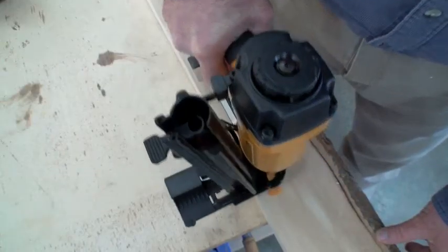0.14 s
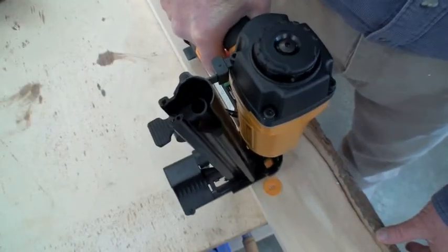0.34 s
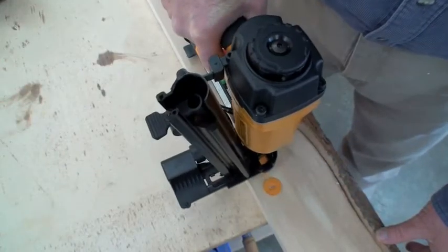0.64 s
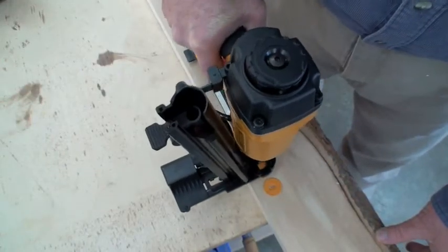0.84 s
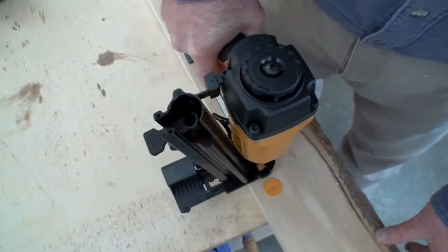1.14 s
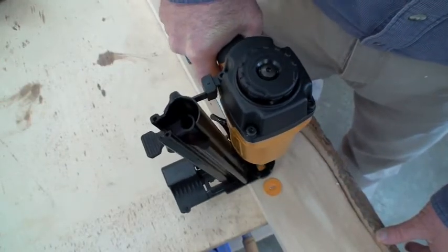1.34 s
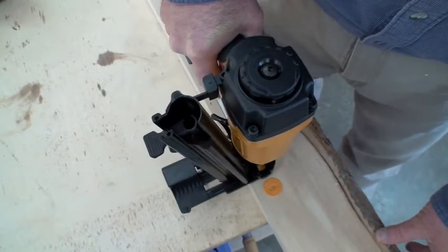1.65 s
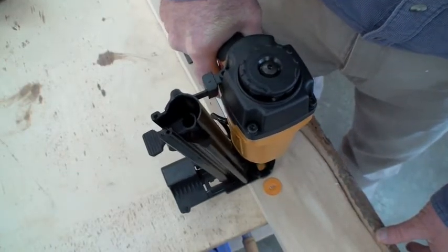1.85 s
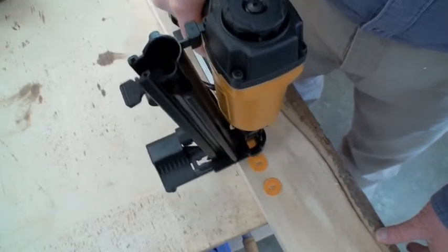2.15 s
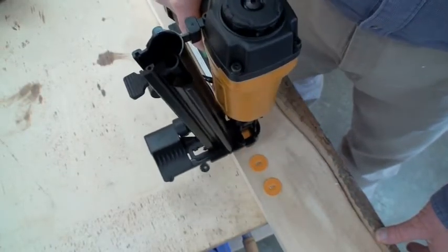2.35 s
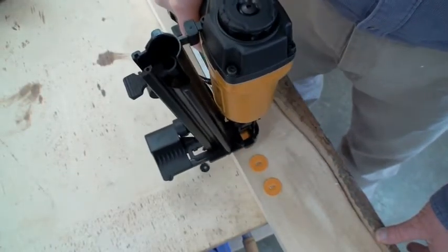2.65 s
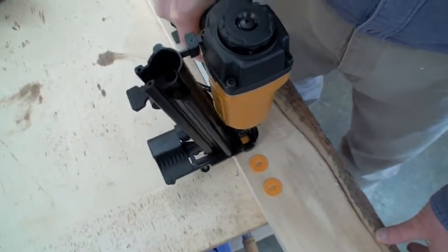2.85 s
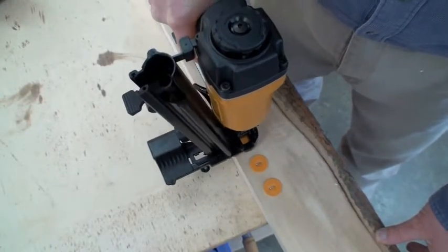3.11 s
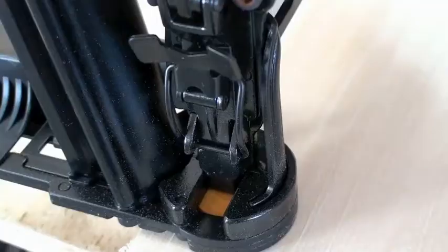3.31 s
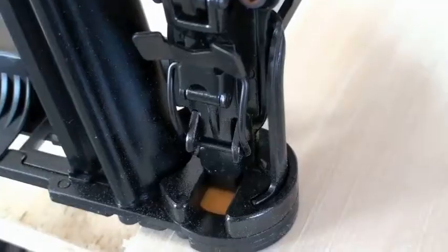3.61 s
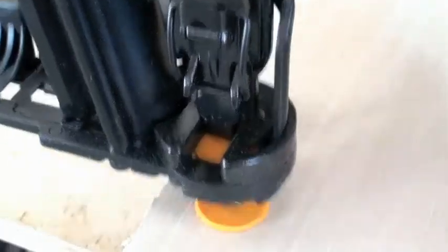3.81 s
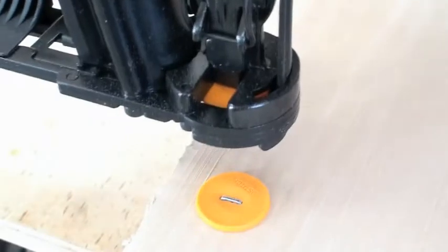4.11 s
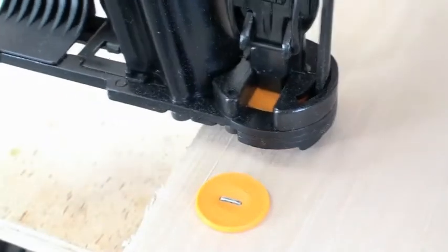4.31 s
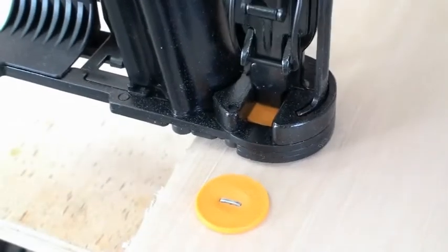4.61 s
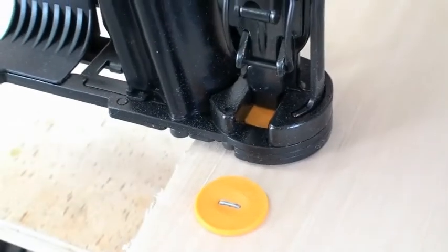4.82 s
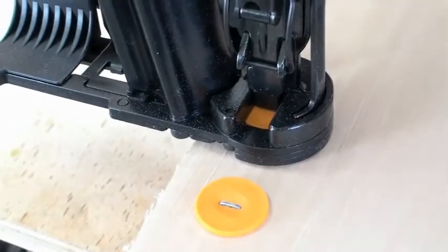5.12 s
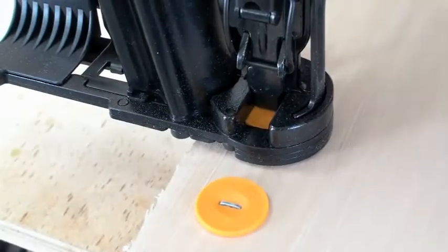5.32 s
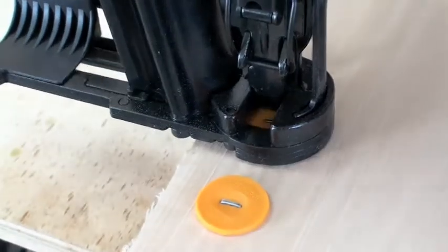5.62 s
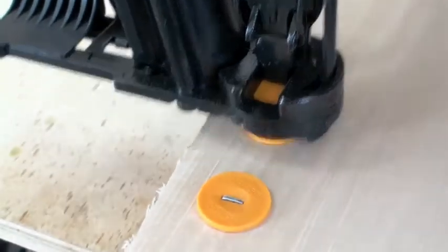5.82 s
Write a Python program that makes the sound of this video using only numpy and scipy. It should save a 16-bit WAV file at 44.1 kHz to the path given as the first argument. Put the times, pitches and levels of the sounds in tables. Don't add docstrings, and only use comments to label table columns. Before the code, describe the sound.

Loud air-tool shots punch caps into a board, spitting short exhaust hisses, while soft wooden thuds and metal ticks fill the gaps over low rumble.

```python
import sys
import numpy as np
from scipy import signal
from scipy.fft import rfft, irfft
from scipy.io import wavfile
from scipy.ndimage import uniform_filter1d

SR = 44100
rng = np.random.default_rng(int(sys.argv[2]) if len(sys.argv) > 2 else 0)


def materialize(psi):
    bounded = np.clip(np.atleast_2d(psi).T, -1, 1)
    quanta = np.round(bounded * 32767).astype(np.int16)
    wavfile.write(sys.argv[1], SR, quanta)


def boost(x):
    u = np.asarray(x, float) / 20
    return 10 ** u


N = 262836
LEAD = SR // 4
SCENE_CHANGE_S = 3.39

# start in seconds, level in dB.
VALVE_POPS = [
    (-.21, 15.5),
    (1.6119, -10),
    (3.4876, -6),
    (5.576, -7.5),
]
# start in seconds, level in dB.
DRIVER_BLOWS = [
    (-.19, 4.1),
    (1.6365, 12),
    (3.5145, 24.5),
    (5.6000, 10.2),
]
# start in seconds, level in dB.
EXHAUST_BLASTS = [
    (-.04, 2.4),
    (1.761, 6.1),
    (3.6772, 10),
    (5.7407, 1.6),
]
# start in seconds, level in dB.
PISTON_RETURNS = [
    (-.012, 10.6),
    (1.7910, 10.7),
    (3.7068, 3.3),
    (5.7690, 2.5),
]

# start in seconds, level in dB.
TOUCHES = [
    (.977, -15),
    (2.922, -19),
    (4.497, -31.5),
    (4.673, -31.5),
    (4.74, -34),
    (4.889, -33),
    (4.915, -36),
]
# start in seconds, level in dB.
BOUNCES = [
    (.988, -16.5),
    (1.599, -21.5),
    (2.932, -20),
    (4.504, -32.5),
]
# start in seconds, level in dB.
PRESSES = [
    (1.036, -5.5),
    (1.094, -16.5),
    (2.976, -0.5),
    (3.014, -14),
    (4.515, -29.5),
    (4.678, -29),
]
# start in seconds, level in dB.
SAGS = [(1.044, -16), (1.057, -12), (1.427, -29), (1.49, -38.5), (3.057, -23), (4.743, -30), (4.753, -19.5),
        (4.83, -29), (4.895, -32), (4.907, -28)]
# start in seconds, level in dB.
TRIGGER_CLICKS = [(1.585, -32.5), (1.747, -11), (3.463, -29), (3.469, -22), (3.656, -20), (5.559, -31.5),
                  (5.566, -28)]
# start in seconds, level in dB.
FEED_RATTLES = [(.176, -15.5), (1.035, -17), (1.057, -31.5), (1.43, -40), (2.071, -20), (3.656, 5),
                (4.504, -32), (4.74, -30)]

# frequency in Hz, density in dB per Hz.
VALVE_SPECTRUM = [(100, 1), (400, 7.5), (800, -6), (1400, 2), (2200, -5.5), (5000, -2), (12000, 0.5),
                  (13500, -8)]
# frequency in Hz, density in dB per Hz.
DRIVER_SPECTRUM = [(50, -5), (120, -17.5), (250, 2), (410, 2.5), (800, -0.5), (1300, 2), (2100, 0),
                   (2700, -5), (5000, -11.5), (11000, -9), (13500, -11)]
# frequency in Hz, density in dB per Hz.
EXHAUST_SPECTRUM = [(100, -26), (500, 4.5), (1500, 0.5), (3000, 6), (4200, 10), (7000, 7), (10500, 11),
                    (12500, 12), (13500, -21.5)]
# frequency in Hz, density in dB per Hz.
PISTON_SPECTRUM = [(60, -19), (200, 0.5), (500, 0), (900, 2.5), (1400, 8.5), (2100, 3), (2700, -5),
                   (5000, -5), (13500, -18.5)]
# frequency in Hz, density in dB per Hz.
THUD_SPECTRUM = [(100, -16.5), (250, 3.5), (500, 8.5), (900, 0.5), (1400, -5), (2200, -10), (3200, -24.5),
                 (8000, -55)]
# frequency in Hz, density in dB per Hz.
TICK_SPECTRUM = [(800, -20), (2000, 10.5), (5000, 3.5), (9000, 8.5), (13000, 5.5)]
# frequency in Hz, density in dB per Hz.
SCUFF_SPECTRUM = [(1500, -20), (2500, 6.5), (4500, 2), (7000, -10), (13000, -14)]
# frequency in Hz, density in dB per Hz.
RUMBLE_SPECTRUM = [(15, -27.5), (25, -14), (140, -0.5), (178, -3), (366, -5), (430, -11), (738, -12),
                   (977, -18.5), (1850, -47), (3000, -35), (3900, -43), (6600, -120)]
# frequency in Hz, density in dB per Hz.
HISS_SPECTRUM = [(590, -50), (1000, -5.5), (1400, -0.5), (2020, -5), (2430, -8), (12300, -13),
                 (13300, -11.5)]

# frequency in Hz, level in dB, T60 in seconds.
BOARD_MODES = [(65.4, -13, 0.061), (120.7, -6, 0.09), (169.5, -8, 0.17), (202.3, -8.5, 0.23),
               (255.3, 3.5, 0.093), (264, -1.5, 0.073), (328.3, -8, 0.25)]
# frequency in Hz, level in dB, T60 in seconds.
PLATE_MODES = [(352, -14, 0.2), (416.3, -1.5, 0.11), (423.6, -1.5, 0.096), (587, -31, 0.032),
               (740, -29, 0.049), (974, -19, 0.052)]
# frequency in Hz, level in dB, T60 in seconds.
BODY_MODES = [(1196, 2.5, 0.013), (1340, -5.5, 0.023), (1504, 1.5, 0.011), (1800, -15, 0.03),
              (2440, -17, 0.026), (3720, -24, 0.027)]

# frequency in Hz, T60 in seconds.
ROOM_T60_S = [(60, .9), (260, 0.61), (700, 0.7), (1840, 0.68), (4850, 0.64), (12800, 0.3)]
# centre in Hz, width in Hz, lift in dB.
ROOM_LIFTS = [(157.6, 42, 8), (826, 98, 6), (1277, 47, 1.5), (1534, 152, -1), (1910, 160, 2.5),
              (2245, 89, 0)]
ROOM_EDGES_HZ = 25 * 2 ** np.arange(0, 9.3, 1 / 3)

# start in seconds, hold in seconds, level in dB.
AIR_GUSTS = [
    (3.80, 0.091, -4),
    (5.89, 0.024, -7),
]
# time in seconds, rate in Hz.
EDDY_RATE_HZ = [
    (3.81, 104.8),
    (3.86, 56.4),
    (3.92, 79.2),
    (3.95, 88.2),
    (3.975, 54.9),
    (5.89, 89.85),
    (5.915, 62),
    (5.96, 55),
]
# time in seconds, gain in dB.
GAIN_DRIFT_DB = [
    (0, 0),
    (1.5, 0.5),
    (2.3, -3.5),
    (4.3, -5.5),
    (5.96, -1),
]


def in_time(rows):
    return np.interp(np.arange(N) / SR, *np.transpose(rows))


def at_hz(points, hz):
    table_hz, values = np.array(points)[:, 0], np.array(points)[:, 1]
    return np.interp(np.log(hz + 1e-9), np.log(table_hz), values)


def coloured(spectrum, size):
    hz = np.fft.rfftfreq(size, 1 / SR)
    noise = irfft(rfft(rng.standard_normal(size)) * boost(at_hz(spectrum, hz)), size)
    return noise / np.std(noise)


def bursts(events, spectrum, rise_s, hold_s, fall_s):
    out, t = np.zeros(N + LEAD + SR), np.arange(SR // 4) / SR
    shape = (1 - np.exp(-t / rise_s)) * np.exp(-np.maximum(t - hold_s, 0) / fall_s)
    target = boost(at_hz(spectrum, np.fft.rfftfreq(len(t), 1 / SR)))
    for start_s, level_db in events:
        i = round(start_s * SR) + LEAD
        raw = rfft(shape * coloured(spectrum, len(t)))
        even = target / np.sqrt(uniform_filter1d(np.abs(raw) ** 2, size=40))
        burst = irfft(raw * even, len(t)) * (t < 0.2)
        burst = burst * np.sqrt(np.sum(shape ** 2) / np.sum(burst ** 2))
        out[i:i + len(t)] += boost(level_db) * burst
    return out[:N + LEAD]


def struck(times_s, levels_db, modes, contact_hz, settle_s):
    at, out = np.round(times_s * SR).astype(int) + LEAD, 0
    spread_db = rng.normal(0, 1.0, (len(at), len(modes)))
    t = np.arange(SR // 20) / SR
    for k, (hz, mode_db, t60_s) in enumerate(modes):
        clicks = np.full(N + LEAD, 1e-18)
        np.add.at(clicks, at, boost(levels_db + mode_db + spread_db[:, k]) * (-1) ** k)
        r, w = boost(-60 / (t60_s * SR)), 2 * np.pi * hz / SR
        push = np.exp(-t / settle_s) * np.cos(w * t * SR)
        driven = signal.oaconvolve(clicks, 2 * push / np.sum(np.abs(push)))[:N + LEAD]
        out = out + signal.lfilter([0, np.sin(w)], [1, -2 * r * np.cos(w), r * r], driven)
    return signal.lfilter(*signal.butter(2, contact_hz, fs=SR), out)


def workshop(x, wet_db, lumpy_db):
    t, tail = np.arange(int(1.3 * SR)) / SR, 0
    chance = np.clip(coloured([(30, 0), (600, 0), (1500, -20)], len(t)), -2, 2)
    lumps = boost(lumpy_db * np.exp(-t / 0.074) * chance)
    white = rng.standard_normal((2, len(t))) * lumps
    for k, (low_hz, high_hz) in enumerate(zip(ROOM_EDGES_HZ, ROOM_EDGES_HZ[1:])):
        band_filter = signal.butter(2, [low_hz, high_hz], "band", fs=SR, output="sos")
        band = signal.sosfilt(band_filter, white[k % 2])
        tail = tail + band * boost(-60 * t / at_hz(ROOM_T60_S, np.sqrt(low_hz * high_hz)))
    hz = np.fft.rfftfreq(len(t), 1 / SR)
    lift_db = sum(db / (1 + (2 * (hz - centre) / width) ** 2) for centre, width, db in ROOM_LIFTS)
    tail = irfft(rfft(tail) * boost(lift_db), len(t))
    tail = tail * (1 - np.exp(-(t / 0.0016) ** 2))
    tail = tail * np.clip((1.1 - t) / 0.2, 0, 1)
    return boost(wet_db) * signal.fftconvolve(x, tail)[:len(x)]


def rumble():
    return boost(-43.5 + 1.16 * in_time(GAIN_DRIFT_DB)) * coloured(RUMBLE_SPECTRUM, N)


def buffeting():
    wander = np.clip(0.4 * coloured([(3, 0), (25, 0), (60, -30)], N), -2, 2)
    phase = 2 * np.pi * np.cumsum(in_time(EDDY_RATE_HZ) * boost(wander)) / SR
    turbulence = coloured([(20, -6), (60, 6.5), (200, -6), (500, -39)], N)
    eddies = np.sin(phase) + 0.36 * np.sin(2 * phase - 1.2) + 0.31 * turbulence
    rise_s, fall_s = 0.014, 0.03
    t, level = np.arange(N) / SR, 0
    for start_s, hold_s, level_db in AIR_GUSTS:
        rise = np.clip((t - start_s) / rise_s, 0, 1)
        fall = np.exp(-np.maximum(t - start_s - rise_s - hold_s, 0) / fall_s)
        level = level + boost(level_db) * rise * fall
    surge_s, surge_width_s, surge_db = 3.888, 0.0092, 2.5
    level = level * boost(surge_db * np.exp(-((t - surge_s) / surge_width_s) ** 2))
    return level * eddies


def squeak():
    start_s, end_s, base_hz, arch_hz = 1.113, 1.176, 5350, 500
    part = np.clip((np.arange(N) / SR - start_s) / (end_s - start_s), 0, 1)
    arch = np.sin(np.pi * part)
    tone = np.sin(2 * np.pi * np.cumsum(base_hz + arch_hz * arch) / SR)
    rough = coloured([(20, 0), (250, -3), (600, -30)], N)
    level = boost(-44) * np.sqrt(arch + 1e-12) * (0.7 + part)
    return level * (0.8 + rough) * tone


def knocks():
    kinds = [
        (TOUCHES, (-19.5, -0.5, -2, -18)),
        (BOUNCES, (-16.5, 1, -6.5, -9)),
        (PRESSES, (-11, 1.5, -12.5, -25.5)),
        (SAGS, (0.5, -15, -20, -26)),
        (TRIGGER_CLICKS, (-27, -5, 1, -14)),
        (FEED_RATTLES, (-12, -38, -32, -2)),
    ]
    contacts = [(s, *np.add(db, mix)) for rows, mix in kinds for s, db in rows]
    s, board_db, plate_db, body_db, tick_db = np.transpose(contacts)
    board = struck(s, board_db, BOARD_MODES, contact_hz=406, settle_s=0.0045)
    plate = struck(s, plate_db, PLATE_MODES, contact_hz=1200, settle_s=0.0044)
    wood = board + plate
    thud_db = np.maximum(board_db, plate_db) - 12.0
    thuds = bursts(zip(s, thud_db), THUD_SPECTRUM, rise_s=0.0026, hold_s=0.00087, fall_s=0.031)
    body = struck(s, body_db, BODY_MODES, contact_hz=5100, settle_s=0.00089)
    ticks = bursts(zip(s, tick_db), TICK_SPECTRUM, rise_s=0.0001, hold_s=0.00057, fall_s=0.0025)
    scuffs = bursts(zip(s, tick_db - 13), SCUFF_SPECTRUM, rise_s=0.002, hold_s=0.0037, fall_s=0.02)
    ticks = ticks + scuffs
    far = boost(-6.5) * wood + boost(-2.0) * thuds + body + boost(0.5) * ticks
    return wood + thuds + body + ticks + workshop(far, wet_db=-33.5, lumpy_db=0.5)


def stapler():
    valve = bursts(VALVE_POPS, VALVE_SPECTRUM, rise_s=0.0016, hold_s=0.006, fall_s=0.0095)
    driver = bursts(DRIVER_BLOWS, DRIVER_SPECTRUM, rise_s=0.00043, hold_s=0.0023, fall_s=0.00088)
    driver = driver + boost(-16.5) * np.roll(driver, round(0.008 * SR))
    exhaust = bursts(EXHAUST_BLASTS, EXHAUST_SPECTRUM, rise_s=0.00074, hold_s=0.0041, fall_s=0.03)
    piston = bursts(PISTON_RETURNS, PISTON_SPECTRUM, rise_s=0.0001, hold_s=0.0045, fall_s=0.0018)
    s, level_db = np.transpose(VALVE_POPS + EXHAUST_BLASTS)
    puff_modes = [(38, 3.5, 0.04), (65.5, 6.0, 0.062)]   # Hz, dB, T60 s
    puffs = struck(s, level_db - 14.5, puff_modes, contact_hz=211, settle_s=0.0062)
    valve_hits = [(s + 0.00199, db + 6) for s, db in VALVE_POPS]
    s, level_db = np.transpose(valve_hits + PISTON_RETURNS)
    clang = struck(s + 0.00134, level_db - 9.5, BODY_MODES, contact_hz=3970, settle_s=0.00034)
    near = valve + boost(-5.5) * driver + exhaust + piston + puffs + clang
    far = boost(-1.0) * valve + boost(4.5) * driver + boost(-9.0) * exhaust + boost(-5.0) * piston
    return near + workshop(far, wet_db=-31, lumpy_db=4.5)


def scene():
    sound = (stapler() + knocks())[LEAD:] + squeak()
    dip_hz, dip_width_hz, dip_share = 1560, 220, 0.6
    band = signal.lfilter(*signal.iirpeak(dip_hz, dip_hz / dip_width_hz, fs=SR), sound)
    sound = sound - dip_share * band * (np.arange(N) > SCENE_CHANGE_S * SR)
    sound = sound + buffeting() + rumble()
    bass = signal.lfilter(*signal.butter(2, 70, fs=SR), sound)
    side = boost(-24.5) * np.roll(bass, SR // 300)
    return np.array([sound + side, sound - side])


def gain_control(dry):
    heard = signal.lfilter(*signal.butter(2, 200, "high", fs=SR), dry[0]) ** 2
    heard = heard + (boost(-2) * dry[0]) ** 2
    sense = np.exp(-1 / (0.0075 * SR))
    start = [np.mean(heard[:SR // 100])]
    sensed = signal.lfilter([1 - sense], [1, -sense], heard, zi=start)[0]
    recover_db = 139.0 * np.arange(N) / SR
    held_db = np.maximum.accumulate(10 * np.log10(sensed + 1e-12) + recover_db) - recover_db
    return dry * boost(-0.95 * np.maximum(held_db + 10, 0))


def band_limit(x):
    return signal.sosfilt(signal.butter(12, 13430, fs=SR, output="sos"), x)


def record(dry):
    x = gain_control(dry)
    hiss = boost(-51 + 0.81 * in_time(GAIN_DRIFT_DB)) * coloured(HISS_SPECTRUM, N)
    fade_s, floor_db = 0.12, -34
    away = np.clip(np.abs(np.arange(N) / SR - SCENE_CHANGE_S) / fade_s, 0, 1)
    fade = np.maximum(np.sin(np.pi / 2 * away), boost(floor_db))
    x = (x + hiss) * fade
    top_cut = signal.ellip(10, 0.3, 60, 12900, fs=SR, output="sos")
    x = signal.sosfilt(top_cut, 1.087 * np.tanh(x / 1.104))
    return band_limit(np.clip(x, -1, 1))


dry = scene()
out = record(dry)
materialize(out)
```